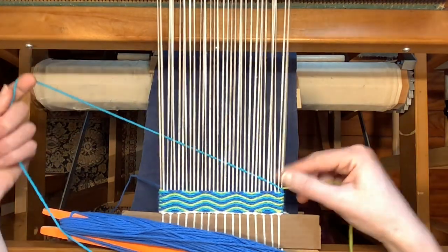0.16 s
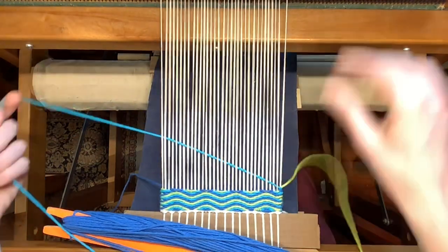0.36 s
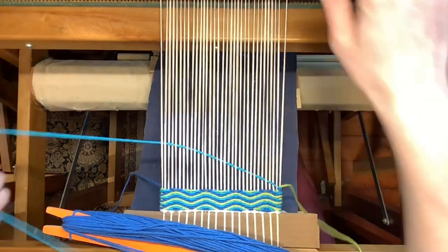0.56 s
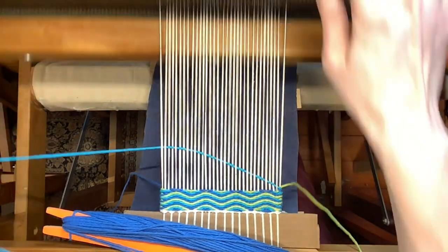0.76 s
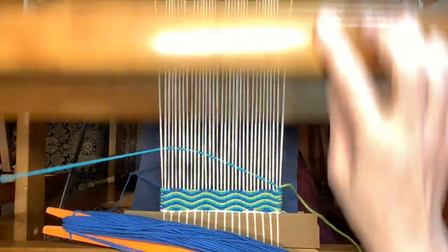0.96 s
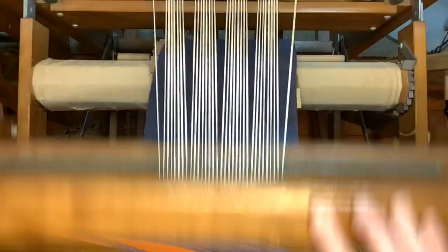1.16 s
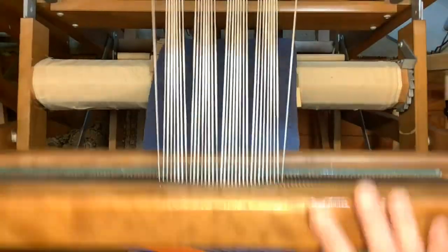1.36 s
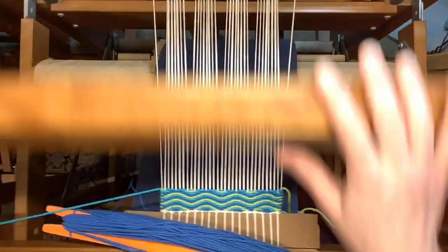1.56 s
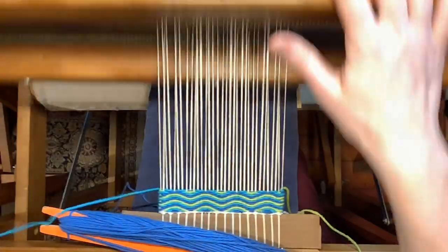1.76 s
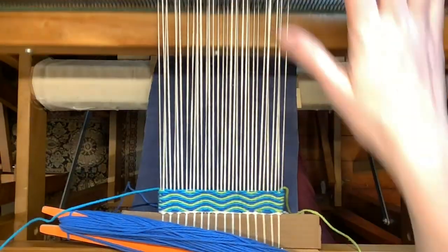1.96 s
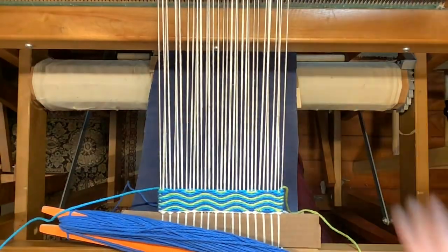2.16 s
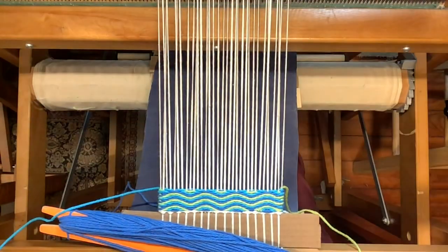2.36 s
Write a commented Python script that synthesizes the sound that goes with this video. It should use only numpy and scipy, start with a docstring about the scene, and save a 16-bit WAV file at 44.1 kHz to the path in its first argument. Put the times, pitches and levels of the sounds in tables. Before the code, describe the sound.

Close up indoors, a wooden loom gives a thin pedal squeak and a quick run of sharp clacks. After a brief lull, its swinging comb presses the yarn, scrapes back on squeaky pivots and settles with a soft thud.

```python
"""A wooden floor loom, worked by hand and heard from close by in a small room.
Its shafts (the frames that lift the threads) clatter into place as a foot pedal squeaks down,
shaking their heddles (the thin wires that hold the threads). The beater, a swinging comb,
presses the yarn in, rasps back along the threads on chirping pivots and bumps its rest.
Underneath, the heavy frame thuds and rumbles and the yarn swishes softly."""
import sys
import numpy as np
from scipy import signal
from scipy.fft import rfft, irfft, next_fast_len
from scipy.io import wavfile
from scipy.ndimage import map_coordinates

SR = 44100
rng = np.random.default_rng(int(sys.argv[2]) if len(sys.argv) > 2 else 0)


def materialize(psi):
    """Save the field psi as 16-bit PCM at rate SR to the path in sys.argv[1].

    A 1-D psi becomes a single channel; in a 2-D psi each row is a channel.
    """
    bounded = np.clip(np.atleast_2d(psi).T, -1, 1)
    quanta = np.round(bounded * 32767).astype(np.int16)
    wavfile.write(sys.argv[1], SR, quanta)


N = 110250
T = np.arange(SR // 2) / SR  # half a second of time for one short sound


def shaft_clatter():
    """The shafts strike the wooden frame in a quick run of sharp clacks."""
    # each clack: start_s, level_db, treble_tilt_db_per_octave, frame_ring_db, pitch_hz
    clacks = [(.3565, -15, 0.5, -5.5, 2895), (.406, -29, -7, 2, 1410), (.421, -10.5, 1, -12, 1336),
              (.432, -17, 4, -14, 1510), (.4445, -22.5, 0.5, -10, 2800), (.459, -23, -3.5, -10, 1280),
              (.4705, -20.5, 3, -3, 1330), (.4925, -18.5, -2, 0, 1293), (.499, -28.5, -1, -11.5, 1510)]
    return wood_blows(clacks, attack_s=0.00054)


def beater_bumps():
    """The beater meets the cloth, and later its rest, with softer blows."""
    # each bump: start_s, level_db, treble_tilt_db_per_octave, frame_ring_db, pitch_hz
    bumps = [(1.26, -31.5, 0, -10, 2460), (1.27, -40, -5.5, -4, 790), (1.3195, -26, 6, -17.5, 3570),
             (2.061, -33.5, -2.5, -8, 1380)]
    return wood_blows(bumps, attack_s=0.00129)


def wood_blows(blows, attack_s, body_db=-4, crack_db=1, knock_db=0.5):
    """Wood hits wood: a crack, a short knock at the struck spot, then the body and frame ring."""
    # tone of struck wood: frequency_hz, level_db
    wood_tone = [(60, -53), (170, -18.5), (440, -5.5), (800, -2), (1350, -2.5), (1700, 1), (2800, 1.5),
                 (6500, -4.5), (10000, -6), (15000, -17)]
    # how long the wood rings: frequency_hz, fade_s
    wood_fades = [(150, 0.19), (500, 0.2), (1500, 0.067), (5000, .11), (14000, 0.21)]
    # the frame's own notes: pitch_hz, level_db, fade_s
    frame_notes = [(426, -14.5, 0.076), (688.3, -16.5, 0.15), (1172, -9, .08), (1261, -7, 0.073),
                   (1415, -3.5, 0.08), (1463, -8.5, 0.063), (1993, -7.5, .06), (2665, -12, 0.11),
                   (4600, -17, 0.07)]
    out, hz = np.zeros(N), np.arange(1, SR // 2)
    for start_s, db, tilt, ring_db, pitch_hz in blows:
        ripple_db = 2.5 * wobble(SR / 110, len(hz))  # a new random rise or dip every 110 Hz
        tone = np.column_stack([hz, along(wood_tone, hz) + tilt * np.log2(hz) + ripple_db])
        body = amp(body_db) * dying(noise(tone, len(T)), wood_fades)
        crack = amp(crack_db) * fade(0.014) * noise(tone, len(T))
        knock = amp(knock_db) * fade(0.019) * np.sin(2 * np.pi * pitch_hz * T)
        frame = amp(ring_db) * ring(frame_notes)
        add(out, start_s, amp(db) * rise(attack_s) * (body + crack + knock + frame))
    return out


def pedal_squeak(octave_db=-1, jitter_hz=120, wander_hz=35):
    """A dry joint sticks and slips: a raspy whistle with a strong overtone an octave up."""
    # bursts of the squeak: start_s, length_s, level_db
    squeaks = [(0.123, 0.023, -43), (0.195, 0.03, -36.5), (0.222, .032, -29), (0.261, 0.037, -30.5),
               (0.3225, 0.003, -22), (0.342, 0.021, -40), (0.368, 0.0034, -18.5)]
    # the path of its pitch: time_s, pitch_hz
    pitch_path = [(.125, 6160), (.155, 6210), (.2, 6320), (.225, 6003), (.254, 6420), (.28, 5844),
                  (.325, 6030), (.37, 6110), (.39, 6130)]
    level = np.zeros(N)
    for start_s, length_s, db in squeaks:
        add(level, start_s, amp(db) * stroke(length_s, attack_s=0.00086, release_s=0.0031))
    pitch_hz = curve(pitch_path) + jitter_hz * wobble(4000, N) + wander_hz * wobble(220, N)
    phase = 2 * np.pi * np.cumsum(pitch_hz) / SR

    def whistle(angle):
        rasp = wobble(800, N) * np.sin(angle) + wobble(800, N) * np.cos(angle)
        return .85 * np.sin(angle) + .4 * rasp

    return level * (whistle(phase) + amp(octave_db) * whistle(2 * phase))


def pivot_chirps():
    """Dry pivots jump from one short squeal to the next, some clean, some broken."""
    # each chirp: start_s, length_s, pitch_hz, glide_hz, level_db, octave_db, roughness (share of pitch)
    chirps = [(0.158, 0.053, 10640, 146, -49, -34, 0.0099), (0.206, 0.011, 4615, 14, -44, -33, 0.0095),
              (1.255, .016, 13500, 4, -44, -43, 0.0089), (1.505, 0.026, 5920, -81, -40, -14, 0.013),
              (1.596, 0.0065, 5930, 21, -28, -20, 0.0029), (1.613, 0.033, 5965, 97, -34.5, -21, 0.027),
              (1.614, 0.027, 3024, -19.5, -43.5, 0.5, 0.031), (1.599, 0.029, 8960, -31, -40, -38, 0.023),
              (1.624, 0.047, 8710, -65.5, -42, -39, 0.011), (1.627, 0.0054, 7150, 3, -31, -16, 0.023),
              (1.639, 0.0383, 1848, -130, -49.5, -2.5, 0.061), (1.696, 0.0325, 1930, -40, -46.5, -3, 0.059),
              (1.732, .028, 1970, 191, -40, -11.5, .05), (1.709, 0.02, 7340, -130, -29.5, -19, 0.0041),
              (1.724, 0.012, 6550, -22, -17, -25, 0.0097), (1.739, 0.015, 11300, -7, -31.5, -40, 0.0065),
              (1.744, 0.0063, 6170, -150, -32.5, -9, 0.022), (1.769, 0.033, 5880, -84, -40, -10.5, 0.014)]
    out = np.zeros(N)
    for start_s, length_s, hz, glide_hz, db, octave_db, roughness in chirps:
        smooth_hz = hz + glide_hz * np.minimum(T / length_s, 1)
        pitch_hz = smooth_hz * (1 + roughness * wobble(2000, len(T)))
        phase = 2 * np.pi * np.cumsum(pitch_hz) / SR
        tone = np.sqrt(2) * (np.sin(phase) + amp(octave_db) * np.sin(2 * phase))
        flutter_db = 24 * np.sqrt(roughness) * np.tanh(wobble(239, len(T)))
        shape = stroke(length_s, attack_s=0.0024, release_s=0.0064)
        add(out, start_s, amp(db + flutter_db) * shape * tone)
    return out


def frame_thuds():
    """The heavy frame takes each jolt with a thud and rumbles while it moves."""
    # each thud: start_s, relative_level_db, pitch_hz
    thuds = [(0.279, -35, 209), (0.376, -34, 169), (0.433, -26, 181), (1.273, -37, 256), (1.276, -33, 145),
             (1.284, -38.5, 82), (2.083, -33.5, 180), (2.161, -39.5, 111)]
    # loudness of the rumble: time_s, level_db
    rumble_levels = [(.06, -84), (.15, -64.5), (.46, -50), (.7, -70.5), (.93, -59.5), (1.1, -83),
                     (1.23, -67.5), (1.3, -51.5), (1.53, -60.5), (1.76, -55), (2.02, -76.5), (2.1, -55.5),
                     (2.2, -60.5), (2.32, -70), (2.5, -85.5)]
    # tone of the rumble: frequency_hz, level_db
    rumble_tone = [(30, -41.5), (48, -21), (75, 0), (300, -2.5), (600, -8.5), (1200, -12.5), (3000, -26.5)]
    out = amp(curve(rumble_levels)) * noise(rumble_tone, N)
    for start_s, db, hz in thuds:
        swing = np.sin(2 * np.pi * hz * T + 1.5 * wobble(61, len(T)))
        add(out, start_s, 2 * amp(db) * rise(0.02) * fade(0.086) * swing)
    return out


def pedal_knocks(puff_db=-9, low_cut_hz=190):
    """The pedal knocks dully: the softer the contact, the fewer of its notes ring."""
    # each knock: start_s, level_db, brightness_hz
    knocks = [(0.124, -41.5, 426), (.196, -30, 1290), (0.259, -42.5, 1500), (0.506, -31.5, 330),
              (.551, -40, 452), (0.716, -59, 750), (0.903, -54.5, 1270), (0.944, -53.5, 1200),
              (1.619, -39.5, 770), (1.689, -40, 412), (1.71, -42, 320), (1.765, -47, 467),
              (1.884, -54, 900), (2.179, -52.5, 1100)]
    # the pedal's own notes: pitch_hz, level_db, fade_s
    pedal_notes = [(288.7, -3, 0.046), (403.8, -1.5, 0.064), (461, -3.5, 0.08), (727, 0, 0.045),
                   (837, 2, 0.041), (1047, 0, 0.09), (1120, -7, 0.12), (1840, -2.5, 0.04)]
    out = np.zeros(N)
    for start_s, db, brightness_hz in knocks:
        puff = fade(0.17) * noise([(200, -37.5), (1000, 6.5), (2000, 1.5), (6000, -8.5)], len(T))
        knock = ring(pedal_notes) + amp(puff_db) * puff
        soften = signal.butter(2, brightness_hz, fs=SR, output="sos")
        add(out, start_s, amp(db) * signal.sosfilt(soften, knock))
    return signal.sosfilt(signal.butter(3, low_cut_hz, "highpass", fs=SR, output="sos"), out)


def small_clicks(width_octaves=0.14, spread_db=-14):
    """Small, sharp clicks from the loom's wires and wooden parts, each dying at once."""
    # each click: start_s, relative_level_db, pitch_hz
    clicks = [(0.196, -44, 2320), (0.624, -47.5, 6200), (0.812, -48, 5840), (1.299, -39, 2800),
              (1.32, -26, 6750), (1.3276, -22.5, 6700), (1.398, -33, 6350), (1.429, -33, 4760),
              (2.0715, -45, 4460), (2.1016, -39.5, 6700), (2.122, -40, 4700), (2.2015, -44, 5930)]
    out = np.zeros(N)
    for start_s, db, pitch_hz in clicks:
        def resonance(hz):
            peak = np.exp(-(np.log2((hz + 1) / pitch_hz) / width_octaves) ** 2)
            spread = hz * pitch_hz / (hz ** 2 + pitch_hz ** 2)
            return peak + amp(spread_db) * spread

        click = unit(filtered(rng.standard_normal(len(T)), resonance))
        add(out, start_s, amp(db + 7) * rise(0.00029) * fade(0.012) * click)
    return out


def thread_rustle(hits_per_s=550, scatter_db=5, crackle_share=0.33, wire_db=-4, wire_count=320):
    """Many tiny touches of thread and steel keep the thin wires ringing, over a fine hiss."""
    # loudness of the rasping comb and shivering heddles: time_s, level_db
    rustle_levels = [(.06, -84.5), (.11, -63), (.33, -44), (.44, -31), (.55, -43), (.66, -52.5),
                     (.78, -61.5), (.88, -59), (1.12, -70), (1.22, -63), (1.265, -50.5), (1.314, -46.5),
                     (1.322, -33), (1.362, -34), (1.385, -35), (1.49, -44.5), (1.7, -47.5), (1.9, -50.5),
                     (2.05, -59), (2.09, -49.5), (2.22, -50), (2.36, -61.5), (2.5, -63.5)]
    # tone of the steel: frequency_hz, level_db
    steel_tone = [(300, -13.5), (1000, -12), (2200, -8), (3500, 0.5), (6000, -0.5), (9500, -2),
                  (12000, -7.5), (15500, -14.5)]
    hits = (rng.random(N) < hits_per_s / SR) * rng.choice([-1, 1], N)
    hits = hits * amp(scatter_db * np.clip(rng.standard_normal(N), -2, 2))
    hit_energy = np.convolve(hits ** 2, fade(.005)[:SR // 100])[:N]
    crackle = unit(np.sqrt(hit_energy) * rng.standard_normal(N))
    wire_pitches_hz = rng.uniform(1500, 15800, wire_count)
    wire_ring = fade(0.12) * sum(np.sin(2 * np.pi * hz * T) for hz in wire_pitches_hz)
    shiver = unit(signal.fftconvolve(hits, wire_ring)[:N])
    hiss = rng.standard_normal(N)
    mix = np.sqrt(crackle_share) * crackle + np.sqrt(1 - crackle_share) * hiss + amp(wire_db) * shiver
    level = amp(curve(rustle_levels) + wobble(70, N))
    return level * unit(filtered(mix, lambda hz: amp(along(steel_tone, hz))))


def yarn_swishes(flutter_db=2.6):
    """Yarn slides softly as hand and beater move."""
    # each swish: start_s, length_s, level_db
    swishes = [(0.088, 0.022, -63.5), (0.712, 0.36, -69.5), (1.19, 0.05, -57), (1.23, 0.02, -56.5),
               (1.784, 0.28, -64)]
    # tone of sliding yarn: frequency_hz, level_db
    yarn_tone = [(200, -47.5), (700, -9), (1200, -5.5), (2500, -2.5), (5000, -14), (12000, -28)]
    level = np.zeros(N)
    for start_s, length_s, db in swishes:
        add(level, start_s, amp(db) * stroke(length_s, attack_s=0.0099, release_s=0.022))
    return level * amp(flutter_db * wobble(63, N)) * noise(yarn_tone, N)


def room(x, echo_db):
    """A furnished room adds a short wash of echoes to the sound."""
    # how long the echoes last: frequency_hz, fade_s
    room_fades = [(100, 0.58), (500, 0.23), (2000, 0.18), (6000, 0.19), (14000, 0.12)]
    tail = dying(rng.standard_normal(len(T)), room_fades) * rise(.005)
    return x + amp(echo_db) * signal.fftconvolve(x, tail / np.linalg.norm(tail))[:N]


def background_hiss(level_db=-85):
    """A very faint, steady hiss lies behind everything."""
    # tone of the hiss: frequency_hz, level_db
    hiss_tone = [(60, -6.5), (2000, 18), (15000, -8.5)]
    return amp(level_db) * noise(hiss_tone, N)


def amp(db):
    """Turn decibels into a volume multiplier."""
    return 10 ** (np.asarray(db) / 20)


def unit(x):
    """Scale a sound to an average power of 1."""
    return x / np.sqrt(np.mean(x ** 2) + 1e-20)


def along(points, hz):
    """Read between (frequency_hz, value) points, with octaves evenly spaced."""
    frequencies, values = np.transpose(points)
    return np.interp(np.log(hz + 1), np.log(frequencies + 1), values)


def curve(points):
    """Join (time_s, value) points with straight lines across the scene."""
    return np.interp(np.arange(N) / SR, *np.transpose(points))


def wobble(rate, size):
    """A smooth curve through `rate` random values a second."""
    return map_coordinates(rng.standard_normal(8192), [np.arange(size) * rate / SR], mode="wrap")


def filtered(x, gain):
    """Turn each frequency of x up or down by gain(hz)."""
    size = next_fast_len(len(x) + 8192)
    return irfft(rfft(x, size) * gain(np.fft.rfftfreq(size, 1 / SR)), size)[:len(x)]


def noise(tone, size):
    """Noise of power 1, shaped by (frequency_hz, level_db) points."""
    return unit(filtered(rng.standard_normal(size), lambda hz: amp(along(tone, hz))))


def rise(attack_s):
    """Swell from silence toward full level."""
    return 1 - np.exp(-T / attack_s)


def fade(fade_s):
    """Die away, losing 60 dB in fade_s seconds."""
    return amp(-60 * T / fade_s)


def stroke(length_s, attack_s, release_s):
    """Swell, hold until length_s, then die away."""
    return rise(attack_s) * np.exp(-np.maximum(T - length_s, 0) / release_s)


def dying(x, fades):
    """Let each frequency of x die away at its own speed."""
    hz, time_s, spectrum = signal.stft(x, SR, nperseg=256)
    decay = amp(-60 * time_s / along(fades, hz)[:, None])
    return signal.istft(spectrum * decay, SR, nperseg=256)[1][:len(x)]


def ring(notes, detune=0.037):
    """A struck object's notes; every blow lands on another spot and rings a little differently."""
    out = np.zeros(len(T))
    for hz, db, fade_s in notes:
        strength = amp(db + rng.normal()) * rng.choice([-1, 1])
        pitch_hz = hz * (1 + detune * rng.uniform(-1, 1))
        phase = 2 * np.pi * pitch_hz * T + .5 * wobble(121.3, len(T))
        out += strength * fade(fade_s) * np.sin(phase)
    return out


def add(track, start_s, x):
    """Mix x into the track, beginning at start_s."""
    first = max(round(start_s * SR), 0)
    track[first:first + len(x)] += x[:max(N - first, 0)]


def scene():
    """The whole loom in its room, as one channel."""
    blows = shaft_clatter() + beater_bumps() + pedal_knocks() + small_clicks()
    squeals = pedal_squeak() + pivot_chirps()
    rustles = thread_rustle() + yarn_swishes() + background_hiss()
    return (room(blows, echo_db=-12) + room(squeals, echo_db=-13) + frame_thuds() + rustles)[None]


def record(dry, low_cut_hz=52, top_hz=15900):
    """The microphone sheds the deepest bass and keeps nothing above top_hz."""
    thinned = signal.sosfilt(signal.butter(4, low_cut_hz, "highpass", fs=SR, output="sos"), dry)
    return np.array([filtered(x, lambda hz: hz < top_hz) for x in thinned])


dry = scene()
out = record(dry)
materialize(out)
```